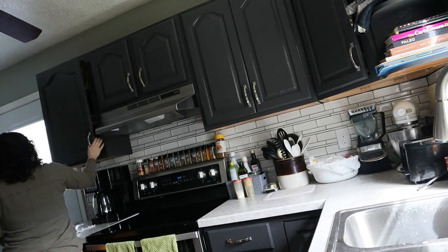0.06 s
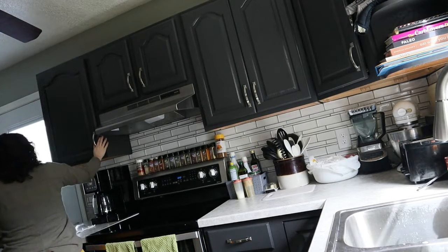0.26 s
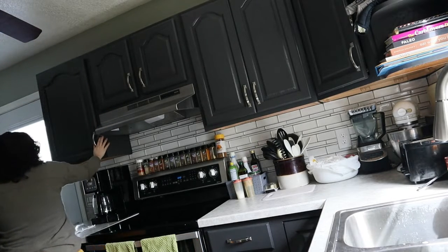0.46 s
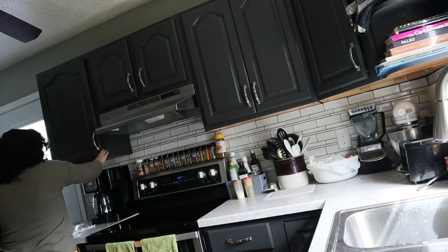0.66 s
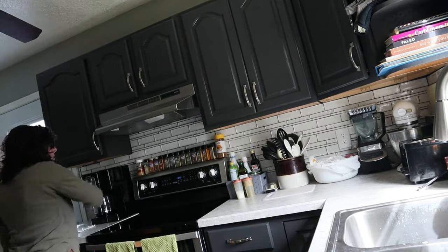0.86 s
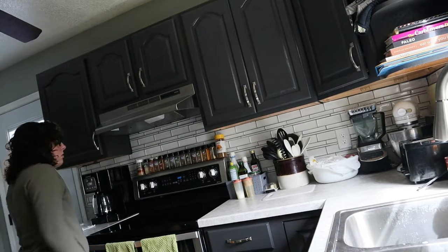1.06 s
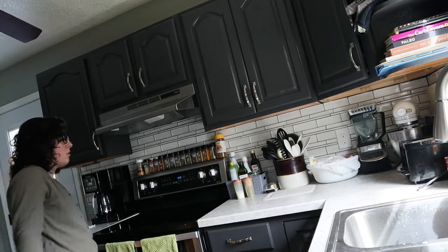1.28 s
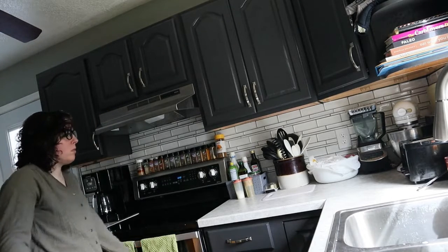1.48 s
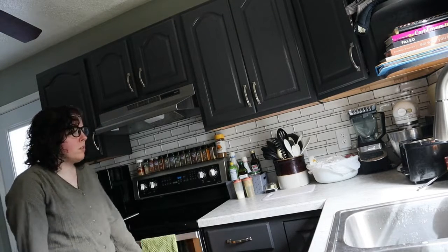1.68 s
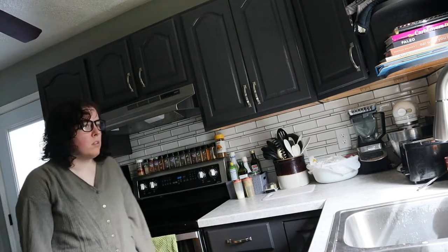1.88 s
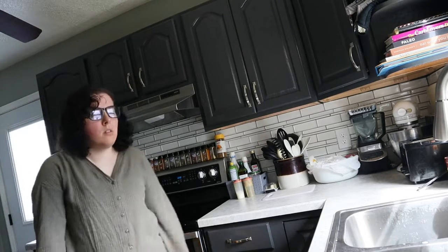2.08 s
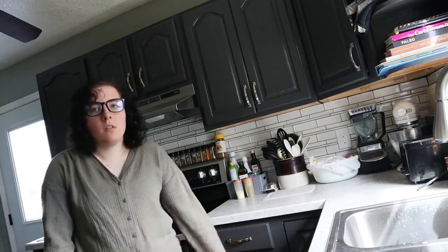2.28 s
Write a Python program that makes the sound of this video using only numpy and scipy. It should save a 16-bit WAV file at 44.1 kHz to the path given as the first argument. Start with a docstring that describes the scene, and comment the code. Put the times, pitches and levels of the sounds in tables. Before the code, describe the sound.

Cupboard door shuts with a sharp woody clap and an immediate boomy second knock, short room tail, then a dull settling bump, cloth swishes and a soft footfall over faint appliance hum in a home kitchen.

```python
"""Cabinet door pushed shut

A wooden wall cabinet door is pushed shut in a kitchen: it claps on the frame, rebounds, lands again with
a hollow boom of the cabinet and settles with a soft bump. Claps and clicks are shaped noise with a short
room tail; panel and cabinet are damped modes. Clothes rustle and feet shuffle as the person turns away
(grainy noise swells, band noise, one low sine), over room air, an appliance's sine hum and a thin whine."""
import sys
import numpy as np
from scipy import signal
from scipy.fft import rfft, irfft, next_fast_len
from scipy.io import wavfile
from scipy.ndimage import map_coordinates

SR = 44100
rng = np.random.default_rng(int(sys.argv[2]) if len(sys.argv) > 2 else 0)


def unload_wav(signal):
    """Save mono or channel-first audio to the path in sys.argv[1] as 16-bit WAV at rate SR, clipped to [-1, 1]."""
    wavfile.write(
        sys.argv[1],
        SR,
        np.round(np.clip(np.atleast_2d(signal).T, -1, 1) * 32767).astype(np.int16),
    )


N = 103149  # samples in the scene

# stereo width of the door's claps and ringing: pitch_hz [Hz], side_over_mid_db [dB]
WIDTH = [(100, -54), (200, -15.5), (380, -12.5), (700, -3.5), (1300, -1), (2400, 1), (4400, 6.5), (8000, 3),
         (14000, -11)]
# stereo width of the room air, whine, clothes and scuffs: pitch_hz [Hz], side_over_mid_db [dB]
SOFT_NOISE_WIDTH = [(100, -21.5), (200, -10.5), (380, -5), (700, -2), (1300, 3.5), (2400, 2), (4400, 6),
                    (9300, 7.5), (11000, -2), (13000, -22)]


def amp(db):
    """Decibels to gain."""
    return 10 ** (np.asarray(db) / 20)


def unit(x):
    """Scale to rms 1."""
    return x / np.sqrt(np.mean(x ** 2) + 1e-20)


def along(points, hz):
    """Read (Hz, value) points on a log frequency axis."""
    point_hz, value = np.transpose(points)
    return np.interp(np.log(hz + 1), np.log(point_hz + 1), value)


def since(start_s):
    """Seconds since start_s, zero before it."""
    return np.maximum(np.arange(N) / SR - start_s, 0)


def swell(peak_s, width_s):
    """A bell-shaped envelope that falls to 1/e at width_s either side of its peak."""
    return np.exp(-((np.arange(N) / SR - peak_s) / width_s) ** 2)


def decay(t, t60_s):
    """Exponential fall by 60 dB in t60_s."""
    return np.exp(-np.log(1000) * t / t60_s)


def struck(t, attack_s, t60_s):
    """Envelope of a blow: a quick rise with time constant attack_s, then an exponential fall."""
    return (1 - np.exp(-t / attack_s)) * decay(t, t60_s)


def filtered(x, response):
    """Multiply the spectrum of x by a response of frequency."""
    size = next_fast_len(N + SR // 4)
    hz = np.fft.rfftfreq(size, 1 / SR)
    return irfft(rfft(x, size) * response(hz), size)[..., :N]


def lowpass_db(hz, corner_hz):
    """Treble lost in a soft contact: 3 dB down at the corner, then 12 dB per octave."""
    return -10 * np.log10(1 + (hz / corner_hz) ** 4)


def noise(colour_db, width=SOFT_NOISE_WIDTH):
    """Coloured stereo noise from independent mid and side; the mid has rms 1."""
    def response(hz):
        mid_db = colour_db(hz)
        return amp([mid_db, mid_db + along(width, hz)])

    mid, side = filtered(rng.standard_normal((2, N)), response)
    return np.array([mid + side, mid - side]) / np.std(mid)


def burst(start_s, colour_db, width, t60_s, room_db):
    """A struck burst of noise, with a kitchen tail whose treble dies first."""
    # room decay: pitch_hz [Hz], t60_s [s]
    room_decay = [(100, 0.94), (400, 0.71), (1000, 0.62), (3000, 0.46), (6000, 0.43), (13000, 0.42)]
    attack_s, room_build_s = .003, 0.0041
    t = since(start_s)
    hz, frame_s, spectrum = signal.stft(noise(colour_db, width), SR, nperseg=256)
    fade = decay(np.maximum(frame_s - start_s, 0), along(room_decay, hz)[:, None])
    tail = signal.istft(spectrum * fade, SR, nperseg=256)[1][:, :N]
    tail = tail * (1 - np.exp(-t / room_build_s))
    direct = noise(colour_db, width) * struck(t, attack_s, t60_s)
    return direct + amp(room_db) * tail


def kitchen():
    """Steady room air as noise, an appliance's hum as sines and its whine as a narrow noise band."""
    # room air colour: pitch_hz [Hz], relative_density_db [dB per Hz]
    air_colour = [(15, -84), (25, -6.5), (118, -2.5), (150, -3), (181, -4), (213, -4), (363, -9.5),
                  (394, -12), (488, -11.5), (1210, -24.5), (1390, -27.5), (1580, -26), (4150, -38),
                  (11500, -47.5), (15000, -49.5)]
    # appliance hum: pitch_hz [Hz], level_db [dB rms]
    hum_tones = [(86, -63), (118.5, -52.5), (178, -53.5), (355.5, -61), (431, -62.5)]
    air_db = -44
    whine_hz, whine_half_width_hz, whine_db = 2700, 65, -65.5  # 6 dB down at the half width

    air = noise(lambda hz: along(air_colour, hz))
    hum = np.zeros(N)
    for hz, level_db in hum_tones:
        cycles = hz * since(0) + rng.random()
        hum += amp(level_db) * unit(np.sin(2 * np.pi * cycles))
    whine = noise(lambda hz: -20 * np.log10(1 + ((hz - whine_hz) / whine_half_width_hz) ** 2))
    return amp(air_db) * air + hum + amp(whine_db) * whine


def clothes():
    """Rubbing cloth: coloured noise in swells, roughened by a random flutter of its level."""
    # swishes: peak_s [s], half_width_s [s, to 1/e], level_db [dB]
    swishes = [(.03, 0.084, -60.5), (.68, 0.18, -58), (.94, 0.059, -64.5), (1.16, 0.11, -59.5),
               (1.318, 0.093, -57), (1.432, 0.072, -47.5), (1.7, 0.18, -63), (1.86, 0.054, -59),
               (2.03, 0.089, -55.5), (2.171, 0.063, -53), (2.284, 0.073, -52.5)]
    # cloth colour: pitch_hz [Hz], relative_density_db [dB per Hz]
    cloth_colour = [(200, 14), (600, 8), (1500, 5), (3500, -0.5), (6000, -6.5), (9000, -9.5), (10500, -1.5),
                    (11700, 0), (13000, -7), (15000, -39)]
    grain_db, grains_per_s = 1, 180

    # one random level per grain, joined smoothly
    grain_position = since(0) * grains_per_s
    flutter = map_coordinates(rng.standard_normal(N // 20), [grain_position])
    grain = unit(amp(grain_db * flutter))
    movement = sum(amp(level_db) * swell(peak_s, width_s) for peak_s, width_s, level_db in swishes)
    return noise(lambda hz: along(cloth_colour, hz)) * grain * movement


def scuffs():
    """Light friction of hand and feet: short bursts of band-limited noise with a room tail."""
    # scuffs: start_s [s], level_db [dB], centre_hz [Hz], half_width_octaves [octaves, 3 dB down]
    scuff_events = [(0.226, -43.5, 3070, 0.67), (1.27, -42.5, 3340, 0.67), (1.831, -39.5, 550, 1.54),
                    (1.981, -50.5, 3500, 0.65), (2.011, -42, 880, 1.03)]
    t60_s, room_db = 0.066, -11
    out = np.zeros((2, N))
    for start_s, level_db, centre_hz, octaves in scuff_events:
        def band(hz):
            distance = np.log2((hz + 1) / centre_hz) / octaves
            return -10 * np.log10(1 + distance ** 6)

        out += amp(level_db) * burst(start_s, band, SOFT_NOISE_WIDTH, t60_s, room_db)
    return out


def footfall():
    """One low thud: a sine that rises in pitch under a bell-shaped swell."""
    peak_s, width_s, level_db = 2.045, .034, -28
    pitch_hz, rise_hz_per_s = 49, 330  # pitch at the peak
    t = since(0) - peak_s
    cycles = (pitch_hz + rise_hz_per_s * t / 2) * t
    return amp(level_db) * swell(peak_s, width_s) * np.sin(2 * np.pi * cycles)


def person():
    """Clothing, scuffs and the footfall together."""
    return clothes() + scuffs() + footfall()


def edge_contacts():
    """The door edge meets the frame: each touch is a noise clap plus a brighter, hard click."""
    # contacts: start_s [s], clap_db [dB], clap_tilt_db [dB per octave], click_db [dB], click_top_hz [Hz]
    contacts = [(0.2856, -27.5, 2.5, -19, 6700), (0.2925, -17, -3.5, -26.5, 18000),
                (0.393, -36.5, -0.5, -26.5, 18000), (0.401, -27.5, -0.5, -40, 8000)]
    # clap colour: pitch_hz [Hz], relative_density_db [dB per Hz]
    clap_colour = [(40, -48), (100, 6), (250, 0.5), (430, -2), (560, -4), (900, -1.5), (1400, -5),
                   (2000, -10), (3000, -17.5), (4200, -17), (6000, -31.5), (10000, -42)]
    # click colour: pitch_hz [Hz], relative_density_db [dB per Hz]
    click_colour = [(500, -11), (1200, 1), (2000, 3), (3000, 2.5), (4000, -6), (5000, -13), (6200, -16.5),
                    (8500, -12), (10000, -19), (11800, -11), (13300, -15), (15300, -41)]
    # click stereo width: pitch_hz [Hz], side_over_mid_db [dB]
    click_width = [(2000, 1), (5000, 6), (10000, 7), (13000, -2)]
    clap_t60_s, clap_room_db = 0.067, -2
    click_t60_s, click_room_db = 0.087, -10
    tilt_pivot_hz = 1500

    out = np.zeros((2, N))
    for start_s, clap_db, tilt_db, click_db, top_hz in contacts:
        def clap(hz):
            return along(clap_colour, hz) + tilt_db * np.log2((hz + 1) / tilt_pivot_hz)

        def click(hz):
            return along(click_colour, hz) + lowpass_db(hz, top_hz)

        out += amp(clap_db) * burst(start_s, clap, WIDTH, clap_t60_s, clap_room_db)
        out += amp(click_db) * burst(start_s, click, click_width, click_t60_s, click_room_db)
    return out


def ring(modes, t, attack_s, corner_hz, length=1):
    """Damped sine modes, with a phase offset between the two channels set by the stereo width."""
    scatter_db = .6  # random spread of the mode levels
    out = np.zeros((2, N))
    for hz, level_db, t60_s in modes:
        phase = np.arctan(amp(along(WIDTH, hz))) * np.array([[-1], [1]])
        gain = amp(level_db + lowpass_db(hz, corner_hz) + scatter_db * rng.standard_normal())
        out += gain * struck(t, attack_s, t60_s * length) * np.sin(2 * np.pi * hz * t + phase)
    return out


def panel_landings():
    """The whole panel lands: its wood rings and the cabinet box booms, duller for a softer contact."""
    # landings: start_s [s], ring_db [dB], boom_db [dB], boom_length [ratio], softness_corner_hz [Hz]
    landings = [(0.2957, -17.5, -18, 1, 9000), (0.402, -28, -6.5, 1.0, 6000), (0.7391, -62, -21, 0.54, 123)]
    # door panel modes: pitch_hz [Hz], relative_db [dB], t60_s [s]
    panel_modes = [(184, 1.5, .18), (205, -5, .38), (381, -5.5, .28), (428, -5, .39), (602, -16, .45),
                   (783, -14, .4), (817, -12, .4), (929, -10, .4), (1112, -15, .35), (1165, -15, .4),
                   (1196, -14, .4), (1493, -17, .35), (1753, -13, .35), (2231, -12, .3), (3457, -18, .3)]
    # cabinet box modes: pitch_hz [Hz], relative_db [dB], t60_s [s, at boom_length 1]
    cabinet_modes = [(55, -19.5, .6), (84.6, -9.5, .5), (95.8, -7.5, .5), (105, .5, .37), (133.5, .5, .34),
                     (165.6, -11, .3), (228, -18, .4), (249, -11.5, .36), (297, -14.5, .22),
                     (372, -20, .45)]
    ring_attack_s, boom_attack_s = .002, .0067

    out = np.zeros((2, N))
    for start_s, ring_db, boom_db, length, corner_hz in landings:
        t = since(start_s)
        out += amp(ring_db) * ring(panel_modes, t, ring_attack_s, corner_hz)
        out += amp(boom_db) * ring(cabinet_modes, t, boom_attack_s, corner_hz, length)
    return out


def door():
    """Edge contacts lead the first two panel landings; the last landing is a soft bump alone."""
    return edge_contacts() + panel_landings()


def scene():
    """The kitchen, the person and the door."""
    return kitchen() + person() + door()


def record(dry):
    """The recorder drops the deepest bass and keeps nothing from its band limit up."""
    low_cut_hz, top_hz = 43, 15300

    def response(hz):
        return (hz < top_hz) / np.sqrt(1 + (low_cut_hz / (hz + 1)) ** 6)

    return filtered(dry, response)


dry = scene()
out = record(dry)
unload_wav(out)
```